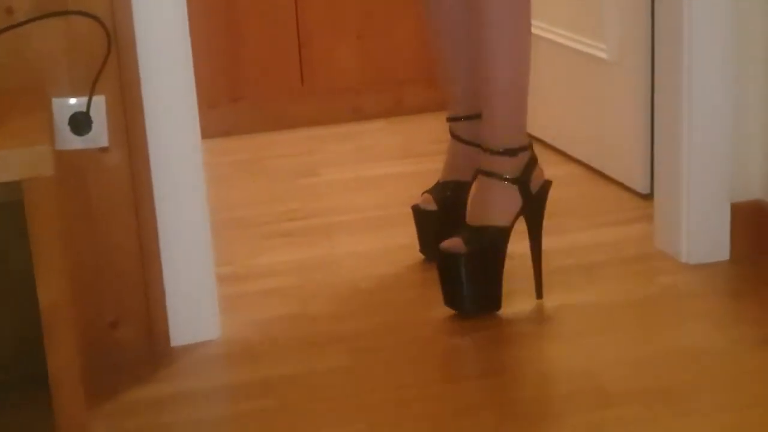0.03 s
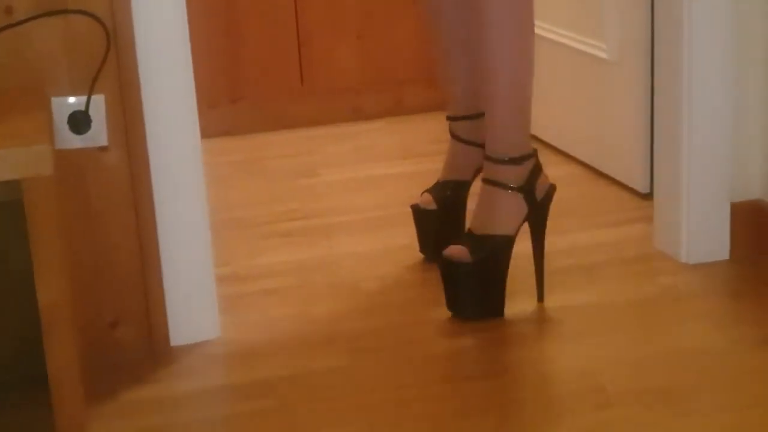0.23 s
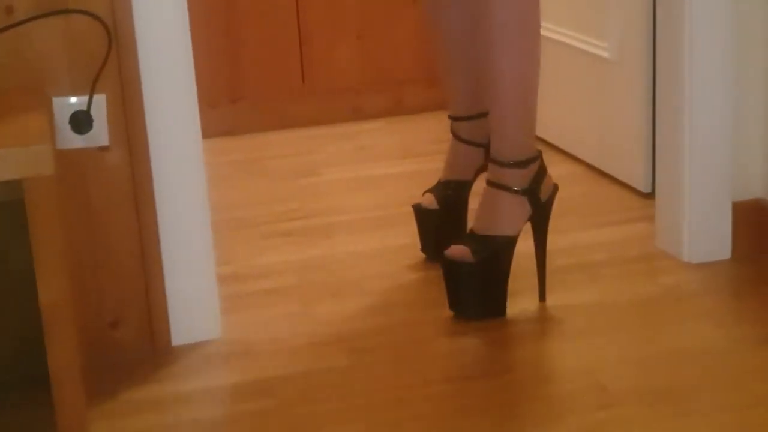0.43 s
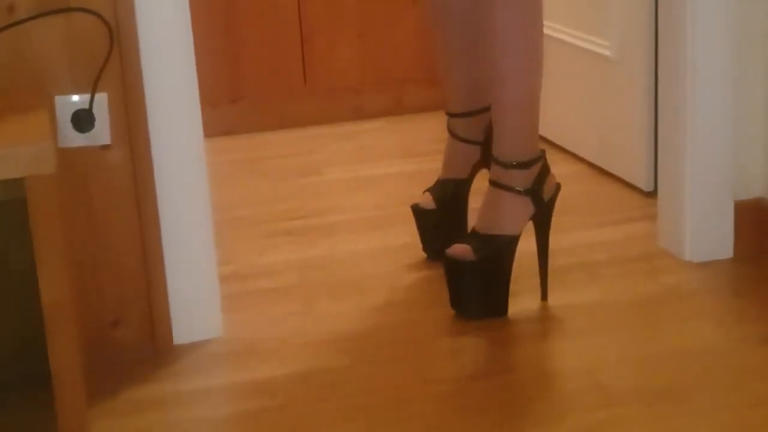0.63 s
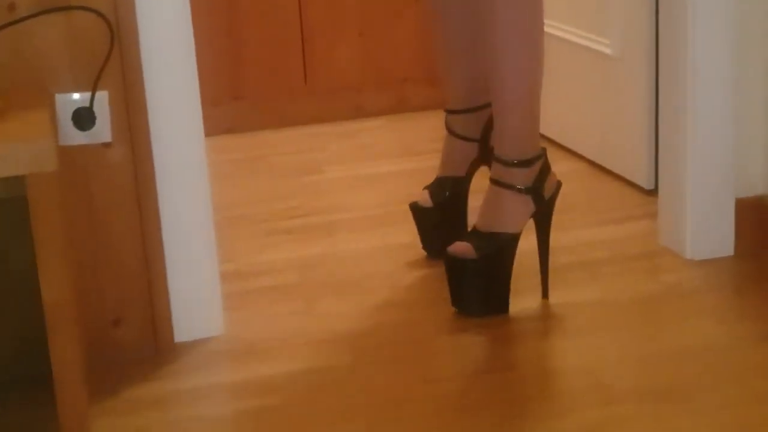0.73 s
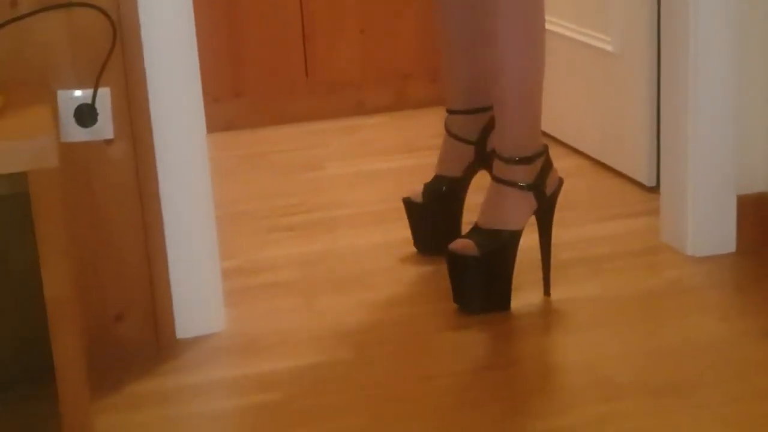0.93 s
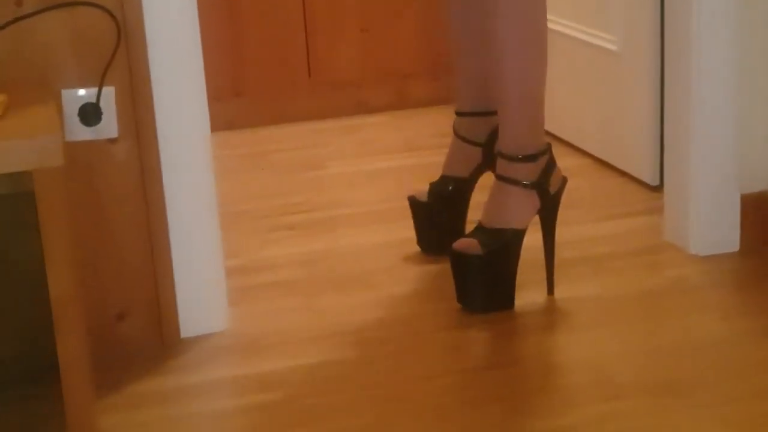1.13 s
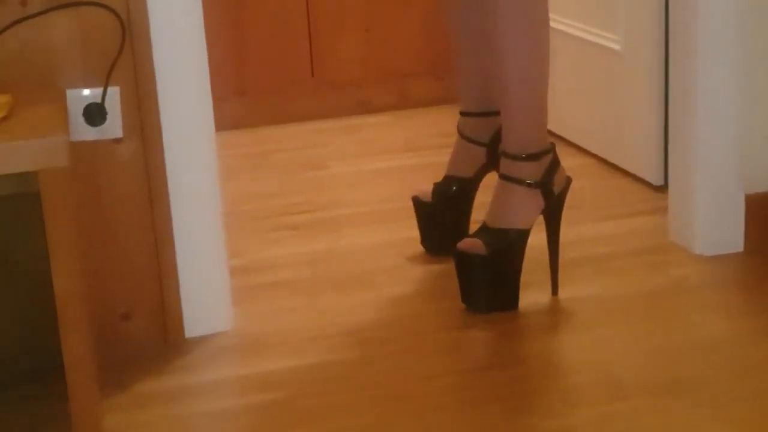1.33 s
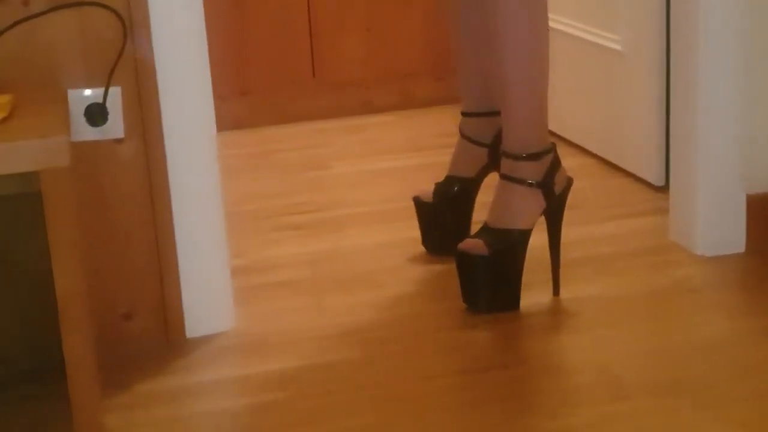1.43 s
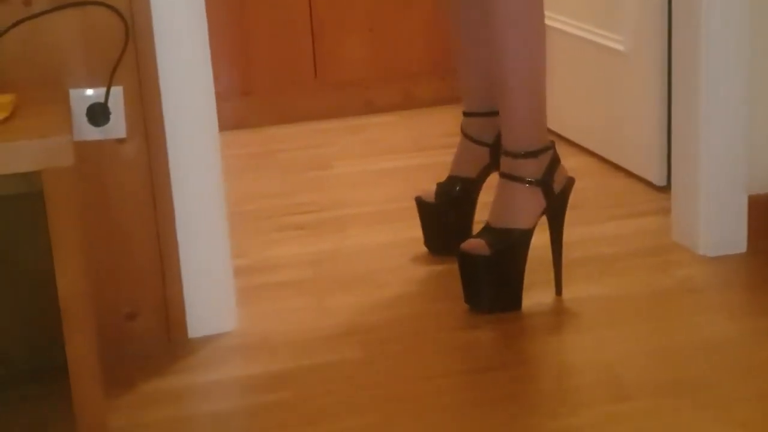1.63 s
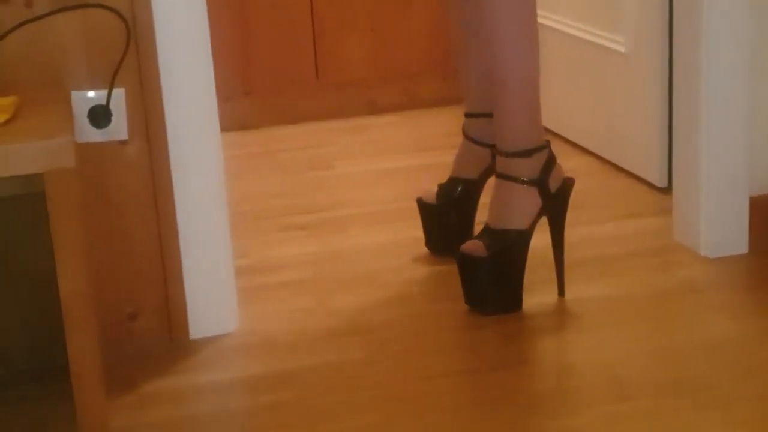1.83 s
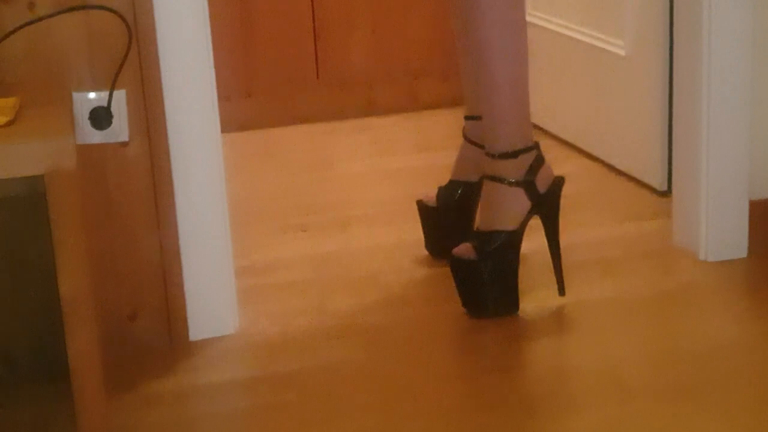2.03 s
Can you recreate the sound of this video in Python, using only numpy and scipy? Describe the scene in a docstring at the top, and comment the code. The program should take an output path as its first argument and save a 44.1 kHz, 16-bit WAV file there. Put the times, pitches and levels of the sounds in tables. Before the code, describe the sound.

Platform high heels step on a wooden floor: a quick cluster of thuds and clacks, a faint heel tick, then two softer knocks, with slight rustling, in a bare room with low hum and hiss.

```python
"""Platform shoes on a wooden floor

In a bare, echoing room soles thud and roll flat, hard edges clack, heel tips tick, straps and soles rustle.
Each contact is an impulse plus fading noise, filtered by what it strikes and followed by a diffuse tail.
Rustle and dragging soles are shaped noise, under a wavering mains hum, room rumble and microphone hiss.
A hand bumps the recorder, mostly near its left port: short damped low pushes."""
import sys
import numpy as np
from scipy import signal
from scipy.fft import rfft, irfft, next_fast_len
from scipy.io import wavfile
from scipy.ndimage import map_coordinates

SR = 44100
rng = np.random.default_rng(int(sys.argv[2]) if len(sys.argv) > 2 else 0)


def volts_from_decibels(level):
    """Turn decibel levels (scalar or array-like) into linear amplitude factors."""
    exponent = np.asarray(level, float) / 20
    return 10 ** exponent


def wav_record(signal):
    """Record a signal, one row per channel, as 16-bit PCM in the file named by sys.argv[1]."""
    frames = np.transpose(np.atleast_2d(signal))
    bounded = np.clip(frames, -1, 1)
    # unit amplitude maps onto the largest positive 16-bit level
    quanta = np.round(bounded * 32767).astype(np.int16)
    wavfile.write(sys.argv[1], SR, quanta)


N = 92610  # samples, 2.1 s


def unit(x):
    """Normalisation: the signal scaled to rms 1."""
    return x / np.sqrt(np.mean(x ** 2) + 1e-20)


def along(points, hz):
    """Logarithmic frequency scale: (Hz, value) points interpolated by pitch interval."""
    f, v = np.transpose(points)
    return np.interp(np.log(hz + 1), np.log(f + 1), v)


def curve(rows):
    """Envelope: (s, value) rows interpolated to one value per sample."""
    s, v = np.transpose(rows)
    return np.interp(np.arange(N) / SR, s, v)


def wobble(rate_hz):
    """Slow random modulation: a smooth curve through rate_hz random knots a second."""
    knots = rng.standard_normal(N // 100)
    return map_coordinates(knots, [np.arange(N) * rate_hz / SR])


def filtered(x, response):
    """Linear filtering: the spectrum times a complex response of frequency."""
    n = x.shape[-1]
    m = next_fast_len(n + 8192)
    return irfft(rfft(x, m) * response(np.fft.rfftfreq(m, 1 / SR)), m)[..., :n]


def causal(gain):
    """Minimum phase: folding the cepstrum makes the gain respond only after its excitation."""
    cepstrum = irfft(np.log(gain + 1e-6))
    half = len(cepstrum) // 2
    cepstrum[1:half] *= 2
    cepstrum[half + 1:] = 0
    return np.exp(rfft(cepstrum))


def spread(pair, alike):
    """Interchannel coherence: mid and side mixed so left and right correlate as given at each frequency."""
    def mid_side(hz):
        angle = np.arccos(np.clip(along(alike, hz), -1, 1)) / 2
        return np.array([np.cos(angle), np.sin(angle)])
    mid, side = filtered(pair, mid_side)
    return np.array([mid + side, mid - side])


def ports(pair, balance):
    """Interchannel level difference: each microphone port has its own colour."""
    def colours(hz):
        return np.array([causal(volts_from_decibels(side * along(balance, hz) / 2)) for side in (1, -1)])
    return filtered(pair, colours)


def rush(spectrum, alike, balance):
    """Coloured noise: white noise shaped in frequency, made stereo, rms 1."""
    noise = filtered(rng.standard_normal((2, N)), lambda hz: volts_from_decibels(along(spectrum, hz)))
    return unit(ports(spread(noise, alike), balance))


def add(out, start_s, x):
    """Superposition: x mixed in at its start time."""
    part = out[:, round(start_s * SR):][:, :x.shape[1]]
    part += x[:, :part.shape[1]]


# likeness of left and right in the background noises: pitch_hz [Hz], correlation [-1 to 1]
FLOOR_ALIKE = [(60, 0.19), (180, 0.99), (550, 0.44), (1650, 0.0012), (4970, -0.0), (15000, 0)]
# port balance for the background noises: pitch_hz [Hz], left_over_right_db [dB]
FLOOR_PORTS = [(60, 10), (130, -8), (290, -6.5), (640, -3.5), (1410, 3.0), (3100, -2), (6820, 3.5),
               (15000, 3.5)]
# hiss spectrum: pitch_hz [Hz], density_db [dB per Hz, relative]
HISS = [(290, -7.5), (600, -2.5), (1100, -10), (1500, -8), (2100, -7), (2700, -10), (3400, -13),
        (4200, -15), (5200, -20), (6300, -20.5), (7300, -22), (8300, -11.5), (9800, -6), (11500, -13),
        (15500, -16)]


def hiss():
    """Stationary noise: microphone hiss at a steady level."""
    return volts_from_decibels(-72.5) * rush(HISS, FLOOR_ALIKE, FLOOR_PORTS)


# rumble spectrum: pitch_hz [Hz], density_db [dB per Hz, relative]
RUMBLE_SPECTRUM = [(12, -47), (20, -45), (34, -9.5), (69, -0.5), (102, 2.5), (125, -10), (205, -11),
                   (295, -19.5), (325, -10), (399, -21.5), (900, -58.5), (1170, -46), (1980, -120)]
# level of the rumble's 130-450 Hz part: time_s [s], level_db [dB]
RUMBLE_LEVEL = [(0, -75), (.4, -73), (.8, -69), (1.0, -77.5), (1.25, -64), (1.4, -71), (1.6, -81),
                (1.68, -68), (1.85, -73), (1.97, -69), (2.1, -75.5)]


def rumble():
    """Amplitude-modulated noise: low room rumble that swells and sinks."""
    whole_over_part_db = 8.5  # whole rumble over its 130-450 Hz part
    level_db = curve(RUMBLE_LEVEL) + whole_over_part_db
    return volts_from_decibels(level_db) * rush(RUMBLE_SPECTRUM, FLOOR_ALIKE, FLOOR_PORTS)


# hum partials before they waver: pitch_hz [Hz], level_db [dB rms]
HUM_PARTIALS = [(99.5, -66), (199, -79.5), (331, -81.5)]
# common waver of the hum: time_s [s], change_db [dB]
HUM_WAVER = [(0, 0), (.1, 0), (.4, 1.5), (.5, 0), (.75, -2), (.95, -1.5), (1.1, 4.5), (1.3, 4.5), (1.38, 4),
             (1.43, -11), (1.6, -1), (1.8, 2.5), (1.95, 4.5), (2.06, 3.5), (2.1, 2)]


def hum():
    """Additive synthesis: mains-hum sines, each drifting in level and phase, that waver together."""
    t = np.arange(N) / SR
    total = np.zeros(N)
    for pitch_hz, level_db in HUM_PARTIALS:
        level = volts_from_decibels(level_db + 2.7 * wobble(30)) * np.sqrt(2)  # rms to peak
        phase = 2 * np.pi * pitch_hz * t + 0.67 * wobble(12)
        total += level * np.sin(phase)
    return volts_from_decibels(curve(HUM_WAVER)) * total


# bumps on the recorder: start_s [s], level_db [dB, before panning], push_s [s], left_over_right_db [dB]
BUMPS = [(1.281, -53, 0.0021, 16), (1.94, -59.5, 0.0033, 19), (1.968, -66, .002, -6),
         (2.015, -58, .006, 18)]


def bumps():
    """Damped oscillation: short low pushes on the recorder body."""
    out = np.zeros((2, N))
    for start_s, level_db, push_s, pan_db in BUMPS:
        u = np.arange(SR // 10) / SR / push_s  # time in push lengths
        push = np.sin(1.8 * u) * np.exp(-u / 2.6)
        add(out, start_s, volts_from_decibels(level_db) * push * volts_from_decibels([[pan_db / 2], [-pan_db / 2]]))
    return out


# likeness of left and right for shoe sounds and room tail: pitch_hz [Hz], correlation [-1 to 1]
ALIKE = [(60, .9), (130, .97), (290, .94), (640, .85), (1400, .1), (3000, 0)]
# port balance for the shoe sounds: pitch_hz [Hz], left_over_right_db [dB]
PORTS = [(60, -3), (80, -4), (110, -4.5), (140, 0), (190, -3.5), (260, -3.5), (340, -2), (460, -5),
         (610, -3), (820, -3), (1100, -3.5), (1470, 4.5), (1960, 16.5), (2620, 2), (3510, 12), (4690, 7.5),
         (6270, -7), (8390, 0), (11200, -6), (15000, 3)]
# a sole drags a little: start_s [s], length_s [s], level_db [dB at mid-swell, before flutter]
DRAGS = [(.49, 0.09, -71), (0.79, .13, -75.5), (1.925, 0.084, -75), (2.005, 0.14, -67.5)]
# drag spectrum: pitch_hz [Hz], density_db [dB per Hz, relative]
DRAG_TONE = [(900, -26), (1400, -11.5), (1700, -12), (2100, -1.5), (2500, -19), (4000, -38)]


def drags():
    """Friction noise: short half-sine swells that ring near 2 kHz."""
    t = np.arange(N) / SR
    swell = np.zeros(N)
    for start_s, length_s, level_db in DRAGS:
        swell += volts_from_decibels(level_db) * np.sin(np.pi * np.clip((t - start_s) / length_s, 0, 1))
    return swell * volts_from_decibels(1.3 * wobble(60)) * rush(DRAG_TONE, ALIKE, PORTS)


# rustle over time: time_s [s], level_db [dB, relative], brightness_db [dB, bright part up and dull part down]
RUSTLE = [(0, -79.5, 9.5), (.2, -74.5, 6.5), (.3, -66, 3), (.42, -72, 0), (.53, -67, -0.5),
          (.58, -66, -1.5), (.64, -61.5, 0.5), (.7, -66.5, -2), (.78, -76, -2), (.9, -73, -2),
          (1.0, -65.5, 0.5), (1.1, -68, -2.5), (1.22, -68, -1.5), (1.32, -71, 2), (1.4, -89, -9),
          (1.9, -85.5, -7), (1.97, -74, 0.5), (2.05, -67.5, 4), (2.1, -70, 2)]
# rustle spectrum before its dull/bright split: pitch_hz [Hz], density_db [dB per Hz, relative]
RUSTLE_TONE = [(600, -17), (1200, -3.5), (1600, -12.5), (2100, -3.5), (2600, -7.5), (3400, -3.5),
               (4100, -11), (5200, 1.5), (6300, -11), (8000, -4.5), (10000, -5.5), (12000, -14.5),
               (14000, -14.5), (15500, -15.5)]


def rustle():
    """Spectral cross-fade: straps and soles whisper, shifting between a dull and a bright noise."""
    time_s, level_db, brightness_db = np.transpose(RUSTLE)
    level = curve(np.transpose([time_s, level_db])) + 1.53 * wobble(30.44) - 3
    tilt = curve(np.transpose([time_s, brightness_db]))

    def whisper(side):
        """Crossover: side 0 loses up to 12 dB above 5-10 kHz, side 1 below it."""
        tone = [(hz, db - 12 * abs(side - np.clip(np.log2(hz / 5000), 0, 1))) for hz, db in RUSTLE_TONE]
        return rush(tone, ALIKE, PORTS)
    dull, bright = whisper(0), whisper(1)
    return volts_from_decibels(level) * (volts_from_decibels(-tilt) * dull + volts_from_decibels(tilt) * bright)


# room decay before the extra fade: pitch_hz [Hz], t60_s [s]
ROOM = [(100, 0.47), (300, 0.46), (800, 0.41), (2000, 0.49), (5000, 0.38), (12000, 0.52)]


def in_room(x, wet_db):
    """Reverberation: a fresh diffuse tail, each frequency decaying at its own speed, joins the direct sound."""
    gap_s, rise_s, fade_s = 0.0031, 0.004, 0.29  # onset gap, build-up, extra fade
    hz, t, z = signal.stft(rng.standard_normal((2, len(x))), SR, nperseg=256)
    decay = volts_from_decibels(-60 * t / along(ROOM, hz)[:, None])
    tail = signal.istft(z * decay, SR, nperseg=256)[1][:, :len(x)]
    t = np.arange(len(x)) / SR
    rise = 1 - np.exp(-np.maximum(t - gap_s, 0) / rise_s)
    tail = spread(tail, ALIKE) * rise * np.exp(-(t / fade_s) ** 2)  # dies ever faster
    wet = signal.fftconvolve(x[None], tail, axes=1)[:, :len(x)]
    # wet_db is tail energy over the direct sound
    return x + volts_from_decibels(wet_db) * wet * np.linalg.norm(x) / np.linalg.norm(wet, axis=1, keepdims=True)


def contact(length_s, after_db, colour, db):
    """Source-filter principle: an impulse, then fading rough contact, both through the struck thing."""
    t = np.arange(int(.7 * SR)) / SR
    blow, rub = filtered(np.array([t == 0, rng.standard_normal(len(t))]), colour)
    shape = (1 - np.exp(-t / .001)) * np.exp(-(t / length_s) ** 2)
    rub = unit(rub * shape) * np.sqrt(np.mean(shape ** 2))
    return volts_from_decibels(db) * blow / np.abs(blow).max() + volts_from_decibels(after_db) * rub


SCRAPE_DB = -11.5  # rough contact relative to the blow, for hard parts
# heel-tip contacts: start_s [s], blow_db [dB peak, direct], centre_hz [Hz],
# fall_db [dB per octave squared], scrape_s [s]
TICKS = [(0.5978, -40.5, 2500, 0.5, 0.025), (1.122, -44, 1970, 16.5, 0.011)]
# heel-tip spectrum: pitch_hz [Hz], density_db [dB per Hz, relative]
TICK_TONE = [(530, -26), (900, -6), (1140, -18.5), (1400, -2), (1580, 0.5), (1800, -4.5), (2100, 4),
             (2540, -10), (3340, -1.5), (3890, -12.5), (5240, -8.5), (6350, -13), (8550, -17.5),
             (11000, -33), (11900, -33), (14600, -47), (15500, -49)]


def ticks(out):
    """Hard impact: brief heel-tip contact excites high modes, narrowed around a centre."""
    for start_s, blow_db, centre_hz, fall_db, scrape_s in TICKS:
        def colour(f):
            octaves = np.log2((f + 1) / centre_hz)
            return causal(volts_from_decibels(along(TICK_TONE, f) - fall_db * octaves ** 2))
        add(out, start_s, in_room(contact(scrape_s, blow_db + SCRAPE_DB, colour, blow_db), 2.5))


# the platform's hard edge meets the floor: start_s [s], blow_db [dB peak, direct], scrape_s [s]
CLACKS = [(0.2193, -46, 0.032), (0.2293, -39, 0.014), (0.2912, -47.5, 0.016)]
# hard-edge spectrum: pitch_hz [Hz], density_db [dB per Hz, relative]
CLACK_TONE = [(590, -30), (1000, -9), (1320, -8), (1450, -9.5), (1710, -11), (2010, -2), (2350, -5.5),
              (3100, 2.5), (3590, -7.5), (3800, -25.5), (5100, -8.5), (6150, -35), (7000, -28), (9100, -64),
              (15400, -120)]


def clacks(out):
    """Hard impact: the platform's edge strikes, then scrapes, with a fixed colour."""
    def colour(f):
        return causal(volts_from_decibels(along(CLACK_TONE, f)))
    for start_s, blow_db, scrape_s in CLACKS:
        add(out, start_s, in_room(contact(scrape_s, blow_db + SCRAPE_DB, colour, blow_db), 4))


# sole landings: start_s [s], blow_db [dB peak, direct], lowest_hz [Hz], softness_hz [Hz, cut-off],
# roll_s [s, roll-down length], roll_db [dB]
THUDS = [(0.2188, -33.5, 252, 740, 0.0085, -38), (.2265, -26, 93, 398, 0.029, -37),
         (0.289, -34.5, 149, 734, 0.027, -43.5), (0.596, -51, 250, 910, 0.037, -61.5),
         (1.0351, -35, 120, 865, 0.077, -46), (1.1216, -39.5, 117, 1210, 0.025, -48.5)]
# floorboard resonances: pitch_hz [Hz], width_hz [Hz], peak_db [dB, relative]
BOARDS = [(135, 77, 0.5), (177, 33, 1.5), (240, 15, -2.5), (373, 13, -1.5), (439, 30, 3), (544, 30, -17),
          (593, 32, -15.5), (665, 13, -9.5), (780, 24, -36), (870, 34, -17)]


def thuds(out):
    """Modal excitation: a soft sole, limited in bandwidth, drives the resonant floorboards."""
    def boards(f):
        gain = volts_from_decibels(-8)  # broad response between the resonances
        for pitch_hz, width_hz, peak_db in BOARDS:
            gain = gain + volts_from_decibels(peak_db) * f * width_hz / np.hypot(pitch_hz ** 2 - f * f, f * width_hz)
        return gain
    for start_s, blow_db, lowest_hz, softness_hz, roll_s, roll_db in THUDS:
        def colour(f):
            soft = 1 / (1 + (f / softness_hz) ** 11)
            return causal(boards(f) * soft * f ** 2 / (f ** 2 + lowest_hz ** 2))
        add(out, start_s, in_room(contact(roll_s, roll_db, colour, blow_db), 4))


def shoes():
    """Superposition of impacts: ticks, clacks and thuds heard through the two ports."""
    out = np.zeros((2, N))
    ticks(out)
    clacks(out)
    thuds(out)
    return ports(out, PORTS)


def scene():
    """Superposition: every source summed at the two ports."""
    return hiss() + rumble() + hum() + bumps() + drags() + rustle() + shoes()


def band_limit(x):
    """A steep low-pass at the top of the band."""
    return signal.sosfilt(signal.butter(12, 15680, fs=SR, output="sos"), x)


def record(dry):
    """Signal chain: the finished mix goes to the recorder's output."""
    return band_limit(dry)


dry = scene()
out = record(dry)
wav_record(out)
```